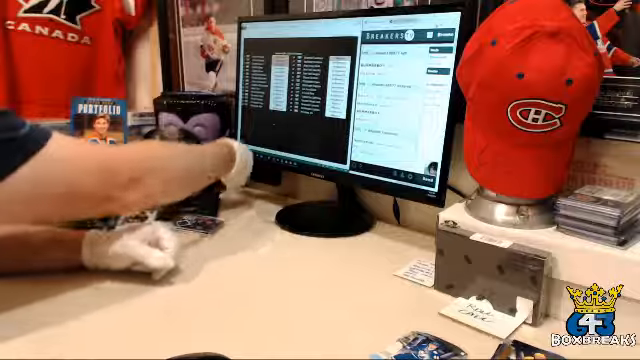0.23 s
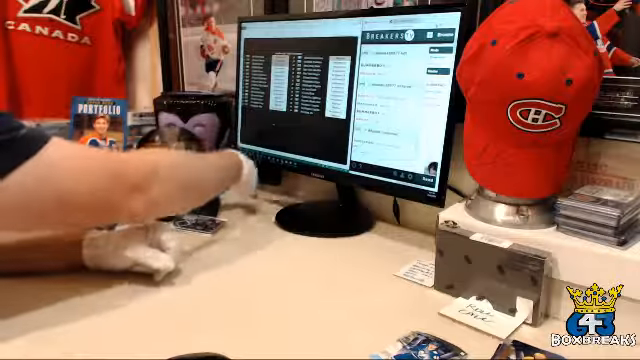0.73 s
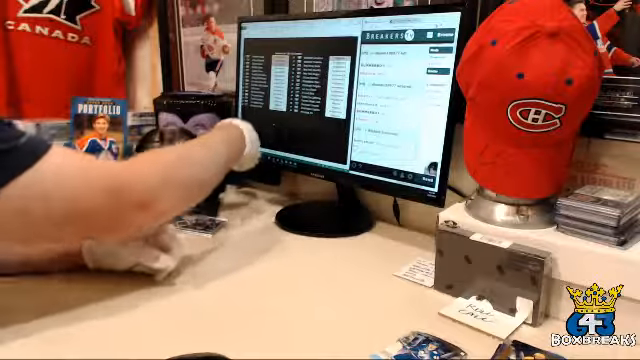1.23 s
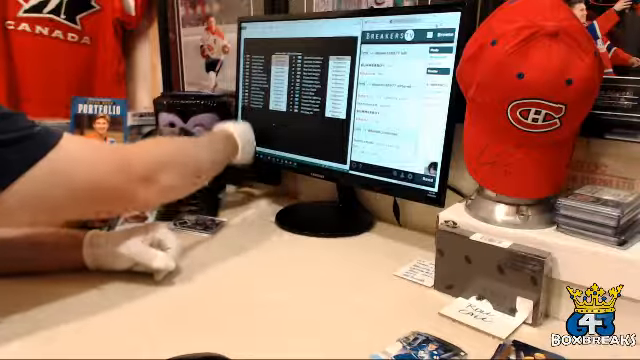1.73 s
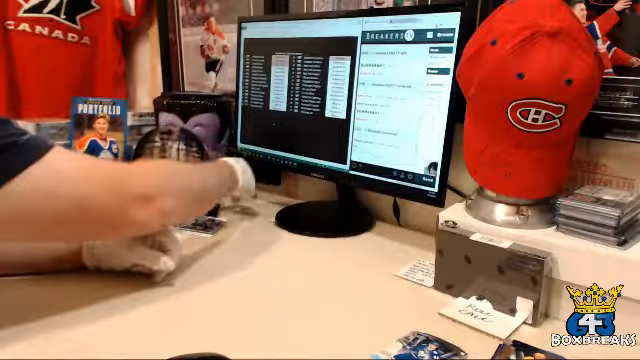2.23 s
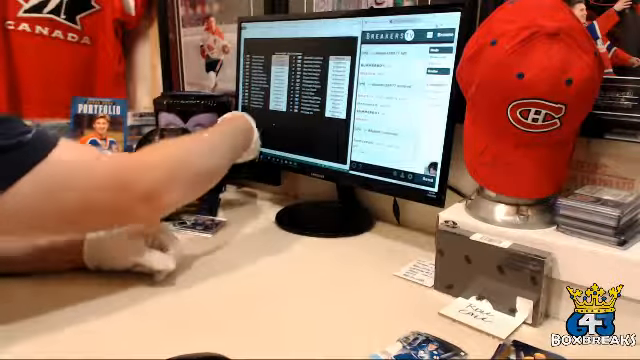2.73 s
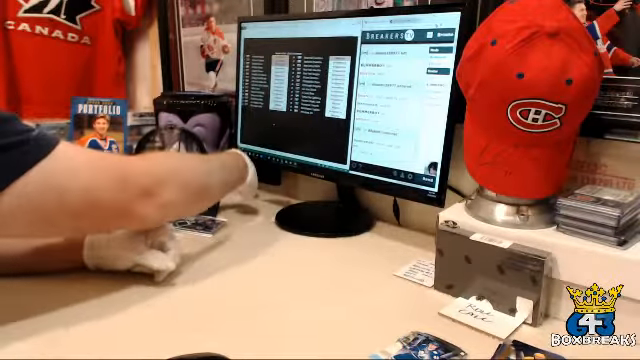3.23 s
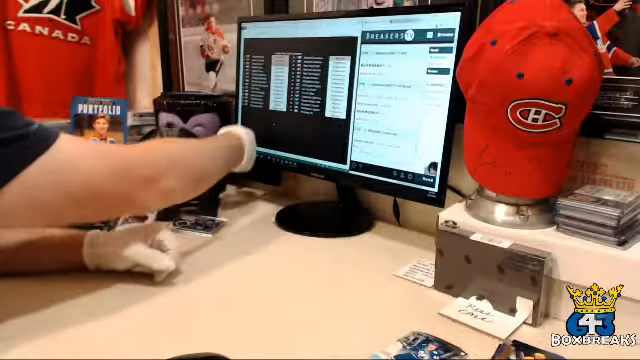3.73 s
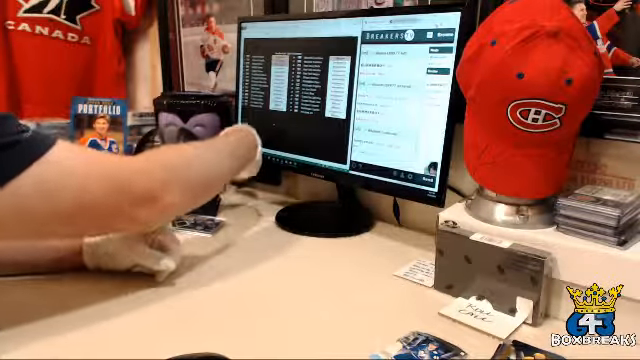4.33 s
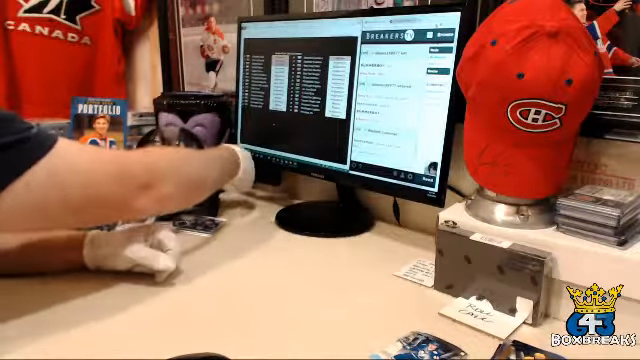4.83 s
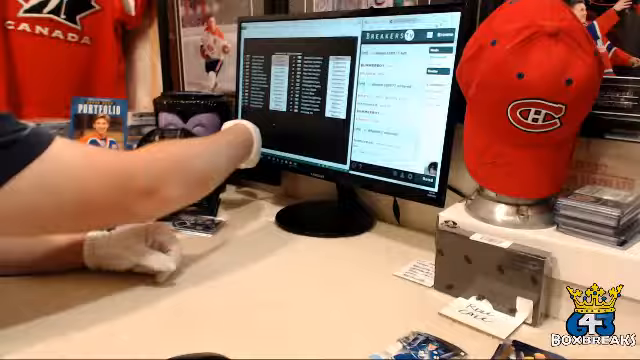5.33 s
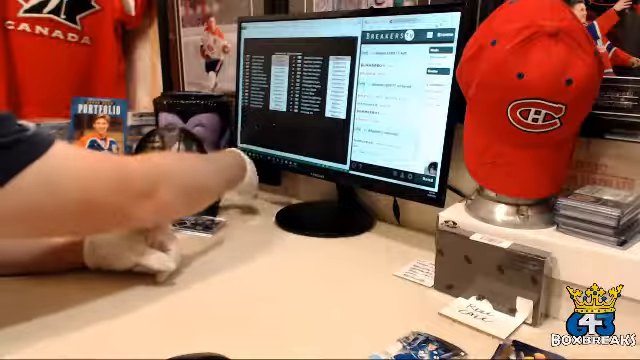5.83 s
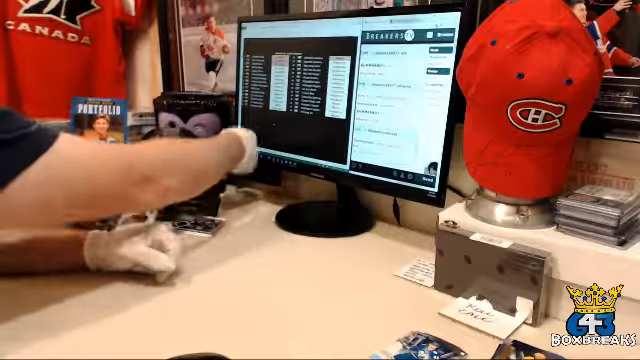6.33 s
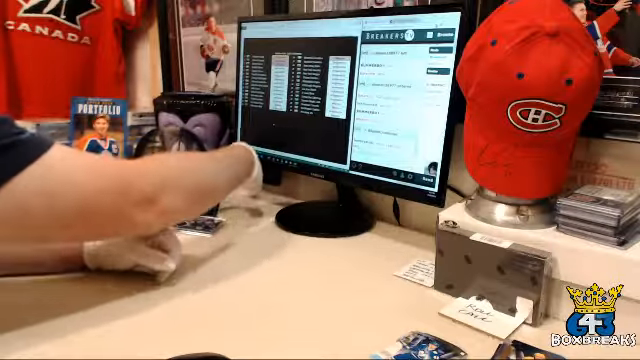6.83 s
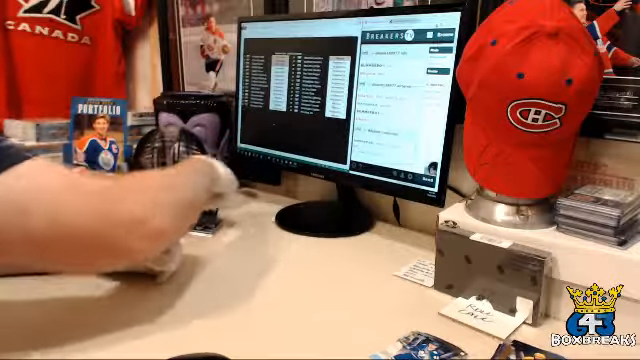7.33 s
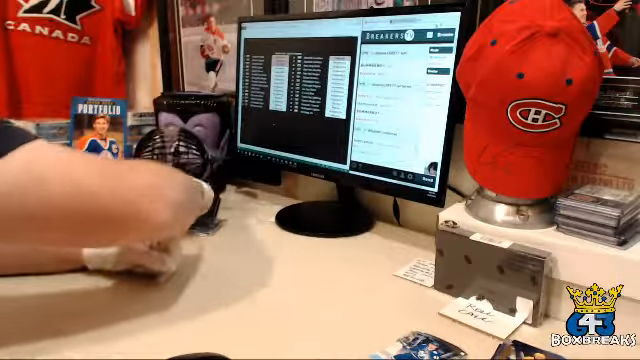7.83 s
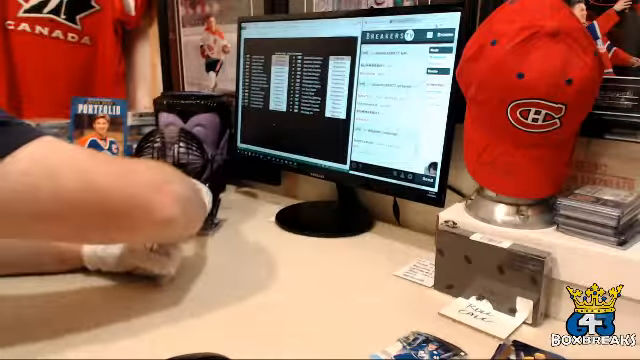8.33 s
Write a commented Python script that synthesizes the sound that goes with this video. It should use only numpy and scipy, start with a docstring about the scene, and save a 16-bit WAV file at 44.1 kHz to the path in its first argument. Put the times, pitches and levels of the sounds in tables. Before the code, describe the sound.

A wire cage full of hard balls is cranked on a desk, crashing loudly, then rattling steadily before one ball clatters down a chute and everything settles.

```python
"""Hand-cranked bingo cage

A wire cage full of balls is cranked on a desk in a small room: the balls crash about, then slide steadily.
Random contacts and clusters of rebounds excite the ringing wires, hoops, stand and desk.
One ball bounces down the chute, the cage stops and the rest settle with a few ticks over the room tone."""
import sys
import numpy as np
from scipy import signal
from scipy.fft import rfft, irfft
from scipy.io import wavfile
from scipy.ndimage import uniform_filter1d, map_coordinates

SR = 44100
rng = np.random.default_rng(int(sys.argv[2]) if len(sys.argv) > 2 else 0)


def wav_record(signal):
    """Record a signal, one row per channel, as 16-bit PCM in the file named by sys.argv[1]."""
    frames = np.transpose(np.atleast_2d(signal))
    bounded = np.clip(frames, -1, 1)
    # unit amplitude maps onto the largest positive 16-bit level
    quanta = np.round(bounded * 32767).astype(np.int16)
    wavfile.write(sys.argv[1], SR, quanta)


N = 378642
TIME = np.arange(N) / SR
RING_TIME = TIME[:16384]   # long enough for one contact to ring out
RING_HZ = np.maximum(np.fft.rfftfreq(len(RING_TIME), 1 / SR), 1)


def from_db(db):
    """Decibels to gain."""
    return 10 ** (np.asarray(db) / 20)


def unit(x):
    """Scale to an average energy of one per channel."""
    energy = np.mean(np.sum(x ** 2, axis=-1))
    return x / np.sqrt(energy + 1e-20)


def add(out, s, sound):
    """Mix a short sound in at time s; it may already be under way at time zero."""
    at = int(s * SR)
    sound, at = sound[max(-at, 0):], max(at, 0)
    out[at:at + len(sound)] += sound[:N - at]


def at_hz(points):
    """A spectrum joined by straight lines on a log frequency axis."""
    hz, value = np.transpose(points)
    return np.interp(np.log(RING_HZ), np.log(hz), value)


def focus(hz, narrow_db):
    """Gain in dB of a contact that favours the modes around one pitch."""
    half_octaves = 2 * np.log2(RING_HZ / hz)
    return -narrow_db * np.log2(1 + half_octaves ** 2)


def pulse(db):
    """The shortest causal pulse with this spectrum: minimum phase, by folding the cepstrum."""
    cepstrum = irfft(np.log(from_db(db)))
    cepstrum[1:] *= 2
    cepstrum[len(cepstrum) // 2:] = 0
    return unit(irfft(np.exp(rfft(cepstrum))))


def through(x, response):
    """Filter x by a response, keeping its length."""
    full = signal.oaconvolve(np.atleast_2d(x), np.atleast_2d(response), axes=-1)
    return full[:, :x.shape[-1]]


def wash(t60, channels=1):
    """Countless weak modes or echoes: noise that dies away by 60 dB in t60 seconds."""
    noise = rng.standard_normal((channels, len(RING_TIME)))
    return unit(noise * np.exp(-np.log(1000) * RING_TIME / t60))


def drift(per_s, t=TIME):
    """Random wandering around zero, in straight lines between per_s new values a second."""
    return np.interp(t * per_s, np.arange(512), rng.standard_normal(512))


def wander(x, share, per_s):
    """Bend time slightly, so that all pitches stray up and down by a small share."""
    bent_time = TIME + share / per_s * drift(per_s)
    return map_coordinates(x[0], [bent_time * SR], order=3)


def contacts(per_s, spread_db):
    """Random touches of uneven strength; their power is evened out over each twentieth of a second."""
    touches = rng.random(N) < per_s / SR
    clicks = touches * from_db(spread_db * rng.standard_normal(N)) * rng.choice([-1, 1], N)
    power = np.maximum(uniform_filter1d(clicks ** 2, SR // 20), 0)
    return clicks / np.sqrt(power + 1e-5)


def blow(db, chatter_s, soft=0.62, count=18, uneven_db=6):
    """A cluster of rebounds that swells (more slowly if soft is large) and dies away."""
    force = np.zeros(len(RING_TIME))
    delay = 3 * (np.arange(count) + rng.random(count)) / count   # in units of chatter_s
    sizes = np.exp(-delay) * (1 - np.exp(-delay / soft))
    sizes = sizes * rng.choice([-1, 1], count) * from_db(rng.normal(0, uneven_db, count))
    force[(delay * chatter_s * SR).astype(int)] = from_db(db) * unit(sizes)
    return force


def clack(hz, attack_s, decay_s, rough=0.32, rough_per_s=180):
    """One resonance that a chattering ball pumps up and lets die; the rebounds jog its strength and phase."""
    shape = (1 - np.exp(-RING_TIME / attack_s)) ** 2 * np.exp(-RING_TIME / decay_s)
    strength = rough * drift(rough_per_s, RING_TIME)
    phase = rough * drift(rough_per_s, RING_TIME)
    return unit(shape * np.exp(strength) * np.sin(2 * np.pi * hz * RING_TIME + phase))


def body(colour, modes, ring_db, wash_db, t60, spot_db):
    """Response to one contact: a click, a diffuse ring and modes whose strengths depend on the spot struck."""
    click = pulse(colour)
    spots = from_db(rng.normal(0, spot_db, len(modes))) * rng.choice([-1, 1], len(modes))
    rings = np.zeros(len(RING_TIME))
    for spot, (hz, width_hz, db) in zip(spots, modes):
        ring = np.cos(2 * np.pi * hz * RING_TIME) * np.exp(-np.pi * width_hz * RING_TIME)
        rings += spot * from_db(db) * unit(ring)
    # the part radiates its modes only within its own range
    rings = through(rings, pulse(np.minimum(colour + 12, 0)))
    diffuse = through(wash(t60), click)
    return unit(click + from_db(wash_db) * diffuse + from_db(ring_db) * unit(rings))


def struck(force, colour, modes, ring_db, wash_db, t60, spot_db, dwell_s, count=7, tint_db=0):
    """Contacts move to another spot after each dwell; each favours other pitches, so the colour keeps shifting."""
    dwell = max(int(dwell_s * SR), 1)   # a dwell of zero picks a spot for every sample
    spot = rng.integers(0, count, N)[np.arange(N) // dwell]
    out = np.zeros((1, N))
    for k in range(count):
        tint = tint_db * np.cos(2 * np.pi * (2 * np.log2(RING_HZ) + k / count))
        response = body(at_hz(colour) + tint, modes, ring_db, wash_db, t60, spot_db)
        out += through(force * (spot == k), response)
    return out


# Colour of the room tone. Each row: frequency in Hz, relative level in dB.
ROOM_TONE = [(25, -18), (65, -32), (110, -5), (150, -2), (260, -3), (400, -16.5), (530, -14.5), (850, -17),
             (1100, -24.5), (2000, -31.5), (2450, -24.5), (2700, -37.5), (4900, -40.5), (8500, -56.5)]
ROOM_TONE_DB = -52.5


def room_tone(apart_db=-3, left_db=2.0, waver_db=1):
    """Low rush of the room: filtered noise, partly shared by both ears, wavering and stronger on the left."""
    air = rng.standard_normal(N) + from_db(apart_db) * rng.standard_normal((2, N))
    air = air * from_db(waver_db * drift(26))
    sides = from_db([[left_db], [-left_db]])
    return from_db(ROOM_TONE_DB) * sides * through(air, pulse(at_hz(ROOM_TONE)))


# Place of the cage between the ears. Each row: frequency in Hz, left minus right in dB.
LEAN = [(60, 1), (130, 6.5), (280, 2), (500, -2.5), (1000, 0.8), (2000, 0.2), (4500, 0)]


def room(x, wet_db, t60):
    """Direct sound leaning to one side by frequency, plus soft reflections that differ at each ear."""
    lean_db = at_hz(LEAN) * np.array([[1], [-1]]) / 2
    direct = np.array([pulse(side) * np.sqrt(np.mean(from_db(side) ** 2)) for side in lean_db])
    return through(x, direct + from_db(wet_db) * wash(t60, channels=2))


# Colour of a contact on desk and stand. Each row: frequency in Hz, relative level in dB.
DESK = [(25, -36.5), (60, -27), (90, -1.5), (140, -7.5), (210, 10.5), (320, -12), (700, -43.5)]
STAND = [(40, -45), (100, -16), (210, 10), (330, 12.5), (450, 3.5), (620, -22), (1200, -47)]
# Ringing of desk and stand. Each row: frequency in Hz, width in Hz, relative level in dB.
DESK_MODES = [(108, 22, 0.5), (146, 15, -3), (212.8, 11, -4.5)]
STAND_MODES = [(325.7, 35, -2)]
# Thumps of the stand on the desk; the row at 6.969 s is instead the low body of the ball's # first hit on the
# chute. Each row: time in seconds (it begins 5 ms earlier), # peak level in dB before the room, pitch in Hz.
THUMPS = [(0.458, -24, 310), (0.665, -24.5, 302), (0.869, -29.5, 153), (1.319, -30, 131),
          (1.456, -28.5, 313), (1.992, -26.5, 317), (2.826, -31.5, 156), (2.894, -36, 108),
          (2.978, -30.5, 146), (3.097, -27.5, 341), (3.669, -31, 167), (3.773, -27, 322), (3.786, -30, 143),
          (4.174, -35.5, 222), (4.334, -35, 135), (4.389, -36, 162), (4.529, -30.5, 325),
          (4.56, -26.5, 134), (4.598, -29, 130), (4.671, -31, 307), (5.187, -37, 148), (5.479, -35.5, 120),
          (5.722, -34, 226), (5.844, -33.5, 332), (6.335, -31.5, 346), (6.444, -26, 301), (6.704, -33, 223),
          (6.969, -27.5, 235), (7.272, -36, 146), (7.846, -35, 149), (8.224, -39, 230.3), (8.475, -43, 240),
          (8.544, -37.5, 238)]
THUMP_SWELL_S = 0.0093


def desk(desk_gain, stand_gain):
    """The stand drums on the desk top, and now and then rocks with a soft thump, a swelling and fading sine;
    one such sine gives the chute's first hit its low body."""
    top_force = desk_gain * contacts(per_s=140, spread_db=2.5)
    top = struck(top_force, DESK, DESK_MODES, ring_db=1.5, wash_db=0.5, t60=0.1, spot_db=7, dwell_s=0.034)
    stand_force = from_db(6.5) * stand_gain * contacts(per_s=150, spread_db=5.0)
    stand = struck(stand_force, STAND, STAND_MODES,
                   ring_db=9.0, wash_db=8.0, t60=0.057, spot_db=0, dwell_s=.03)
    thumps = np.zeros(N)
    swell = RING_TIME / THUMP_SWELL_S
    shape = (swell * np.exp(1 - swell)) ** 2
    for s, db, hz in THUMPS:
        add(thumps, s - .005, from_db(db) * shape * np.sin(2 * np.pi * hz * RING_TIME))
    return top + stand + thumps


# Colour of a contact on the chute. Each row: frequency in Hz, relative level in dB.
CHUTE = [(60, -39.5), (250, -14), (500, -14.5), (750, -5.5), (1600, -2.5), (2400, -4), (3050, -9.5),
         (4350, 1), (5000, -8.5), (7500, -28)]
# Ringing of the chute. Each row: frequency in Hz, width in Hz, relative level in dB.
CHUTE_MODES = [(1650, 40, 2), (2250, 20, -6), (4170, 100, -5)]
# A ball bouncing down the chute. Each row: start in seconds, chatter level in dB, ring level in dB,
# ring pitch in Hz, decay time in seconds, low-pass cut-off of the chatter in Hz.
DROPS = [(6.9682, 8, -8.5, 1870, 0.00037, 2160), (6.977, 2.5, 7.5, 2650, 0.0019, 3300),
         (6.985, 2, 5, 2500, .0062, 3500), (7.019, 6.5, 4.5, 2250, 0.0092, 4940),
         (7.033, 7.5, 4.5, 1724, 0.009, 4800), (7.065, 5, -2, 1630, .003, 4900),
         (7.075, 0, -2, 1665, .007, 4900), (7.186, -2, -5.5, 1180, 0.0036, 5200),
         (7.1965, 4.5, -7, 1850, 0.0034, 5830), (7.2055, 5, 5, 1655, 0.0052, 5200),
         (7.263, -12.5, -17.5, 1650, 0.016, 4500)]


def chute(narrow_db=0.9):
    """Each bounce is a blunt chatter on the chute, with a firm ring whose pitch depends on where the ball lands."""
    out = np.zeros(N)
    for s, chatter_db, ring_db, hz, decay_s, top_hz in DROPS:
        walls = body(at_hz(CHUTE) + focus(hz, narrow_db), CHUTE_MODES,
                     ring_db=-9, wash_db=-7, t60=.04, spot_db=1)
        chatter = through(blow(0, decay_s, soft=.6, count=60, uneven_db=2), walls)
        low_pass = signal.butter(8, top_hz, fs=SR, output="sos")
        blunt = unit(signal.sosfilt(low_pass, chatter))[0]
        ring = clack(hz, attack_s=decay_s, decay_s=decay_s)
        add(out, s, from_db(chatter_db) * blunt + from_db(ring_db) * ring)
    return out


# The heap sliding while the cage turns. Each row: time in seconds, level in dB before each part's own gain.
SLIDE = [(0, -20), (0.33, -24.5), (0.42, -30.5), (0.9, -24.5), (1.3, -35), (1.41, -39.5), (1.7, -37),
         (2.27, -36.5), (2.39, -48), (2.53, -38.5), (2.61, -43.5), (2.79, -39.5), (3.0, -40), (3.27, -35),
         (3.57, -40.5), (3.8, -35), (4.03, -40), (4.2, -36), (6.3, -37), (7.14, -38.5), (7.25, -52.5)]
STOP_DB_PER_S = 89   # the sliding dies once the crank stops
# the slide swells as each rib passes under the heap; rate is typical, unevenness is a log spread
RIBS_PER_S, RIB_UNEVEN, RIB_FLUTTER_DB = 14, 0.25, 1.57


def sliding():
    """Gain of the sliding heap: it flutters as the ribs pass and dies when the cage stops."""
    s, db = np.transpose(SLIDE)
    passes = np.cumsum(np.exp(RIB_UNEVEN * rng.standard_normal(256))) / RIBS_PER_S
    flutter = np.cos(2 * np.pi * np.interp(TIME, passes, np.arange(len(passes))))
    stopping_db = STOP_DB_PER_S * np.maximum(TIME - s[-1], 0)
    return from_db(np.interp(TIME, s, db) + RIB_FLUTTER_DB * flutter - stopping_db)


# Colour of a contact on the frame. Each row: frequency in Hz, relative level in dB.
FRAME = [(60, -48.5), (250, -16.5), (480, -11), (610, -25.5), (740, -5.5), (870, -8.5), (1010, 0.5),
         (1180, -4.5), (1420, -5), (1600, -6), (2000, -5), (2500, -9.5), (3500, -14.5), (8000, -51.5)]
# Ringing of the hoops under the dragging heap. Each row: frequency in Hz, width in Hz, relative level in dB.
DRAG_MODES = [(735, 50, -2), (1650, 42, 0)]


def dragging(turning):
    """While the cage turns, the heap bumps softly over the hoops and keeps their low modes humming."""
    force = from_db(-52.5) * turning * contacts(per_s=84, spread_db=3.5)
    return struck(force, FRAME, DRAG_MODES, ring_db=13.5, wash_db=7, t60=0.088, spot_db=14, dwell_s=.04)


# Single balls knocking on the hoops. Each row: time in seconds (it begins 5 ms earlier),
# strength in dB before the chatter and ring gains, pitch in Hz.
KNOCKS = [(0.012, 3.5, 3100), (0.488, 4, 1041), (0.546, 2, 1954), (0.568, 3, 976), (0.61, 0.5, 2200),
          (0.657, 0, 1120), (0.811, 0.5, 1035), (1.069, -2, 1018), (1.188, 2.5, 1046), (1.22, -3.5, 1580),
          (1.285, -5, 1560), (1.357, -2.5, 1580), (1.562, -4, 1093), (1.595, -13, 2400), (1.88, -4, 1570),
          (1.9, -5, 963), (1.954, -6.5, 970), (2.004, -6.5, 1860), (2.022, -4, 1053), (2.055, -6, 1284),
          (2.084, -2, 1140), (2.167, -1.5, 1203), (2.635, 2.5, 1116), (2.65, -1, 2290), (2.845, -2.5, 949),
          (3.045, -9, 2210), (3.103, -0.5, 2243), (3.136, -8, 2520), (3.217, -5, 1190), (3.671, -3, 954),
          (3.7, -11, 2200), (3.719, -1.5, 2710), (3.765, -5.5, 1050), (4.114, -8, 1613),
          (4.356, -9.5, 1130), (4.415, -5, 1610), (4.534, -5.5, 944), (5.018, -10, 1584), (5.377, -2, 935),
          (5.464, -8, 967), (5.846, -12.5, 1195), (5.972, -7.5, 1610), (6.164, -13, 1573),
          (6.765, -11, 1180)]


def knocks(narrow_db=9, chatter_db=-5, ring_db=-0.5):
    """A lone ball chatters on a hoop, which answers with a short pitched clack."""
    out = np.zeros(N)
    for s, db, hz in KNOCKS:
        rebounds = blow(0, chatter_s=.015, soft=1.7, count=40, uneven_db=2.5)
        chatter = unit(through(rebounds, pulse(focus(hz, narrow_db))))[0]
        ring = clack(hz, attack_s=0.01, decay_s=0.012)
        add(out, s - .005, from_db(db) * (from_db(chatter_db) * chatter + from_db(ring_db) * ring))
    return out


# Ringing of the frame. Each row: frequency in Hz, width in Hz, relative level in dB.
FRAME_MODES = [(937.7, 16.4, 2), (1022, 50, 1), (1102, 51, 0), (1202, 21, 4), (1540, 23, 4.5),
               (1624, 18, -4), (1680, 22, -7.5), (2202, 26, -3)]
# Single hard hits, also played by clashes() and hits(). Each row: start in seconds,
# level on the wires in dB, level on the frame in dB, pitch in Hz.
HITS = [(0.007, 9.5, -10, 6780), (0.065, 6.5, 4.5, 6200), (0.123, 8, 2, 6950), (0.142, 8.5, 3.5, 7040),
        (0.459, 8, -3, 4630), (0.525, 2, 5, 6500), (0.601, -5, -7, 5500), (0.842, 9, 0, 6600),
        (1.067, 4, -6, 4470), (1.126, 4.5, 1.5, 6060), (1.191, 3, -1, 4350), (1.264, 3.5, -12, 6000),
        (1.451, 2.5, -13, 4840), (2.629, 1.5, -9.5, 5400), (3.611, -9, -18, 5000),
        (4.403, -12.5, -10.5, 3550), (5.841, -4.5, -15.5, 4900)]
# Balls settling, also played by clashes() and wires(). Each row: start in seconds,
# level on the wires in dB, level on each other in dB.
TICKS = [(7.312, -31, -29), (7.3574, -29, -35), (7.435, -30, -33.5), (7.6016, -36.5, -36),
         (7.819, -33.5, -45), (8.2128, -34, -39), (8.2287, -28.5, -49)]
TICK_FRAME_DB = 10.5   # the frame takes this much more of a tick than the balls


def frame(level):
    """Heavier knocks of falling balls ring the hoops; settling balls stir them faintly."""
    force = from_db(-0.5) * level * contacts(per_s=300, spread_db=0.5)
    for s, wire_db, frame_db, hz in HITS:
        add(force, s, blow(frame_db, chatter_s=0.0059))
    for s, wire_db, ball_db in TICKS:
        add(force, s, blow(ball_db + TICK_FRAME_DB, chatter_s=0.067))
    return struck(force, FRAME, FRAME_MODES, ring_db=8.5, wash_db=9, t60=0.035, spot_db=4.0,
                  dwell_s=.02, count=9, tint_db=2.0)


# Colour of balls rubbing in the heap. Each row: frequency in Hz, relative level in dB.
BALL = [(60, -64.5), (1400, -23), (2200, -3.5), (2850, -3), (3200, 2.5), (3900, 5), (5000, -14),
        (8500, -36.5)]
# Ringing of the hoops when balls click together. Each row: frequency in Hz, width in Hz, relative level in dB.
HOOP_MODES = [(2643, 54, -1.5), (2710, 14, 3), (3198, 40, -1)]
HIT_CLASH_DB = -1   # a hard hit also cracks against the next ball, this far from its level on the frame


def clashes(level):
    """Hard balls click together in the heap, or as they settle, and stir the upper modes of the hoops."""
    force = from_db(-1.0) * level * contacts(per_s=900, spread_db=0.5)
    for s, wire_db, ball_db in TICKS:
        add(force, s, blow(ball_db, chatter_s=0.0034))
    for s, wire_db, frame_db, hz in HITS:
        add(force, s, blow(frame_db + HIT_CLASH_DB, chatter_s=.005))
    return struck(force, BALL, HOOP_MODES, ring_db=0.5, wash_db=10.0, t60=0.086, spot_db=2.5,
                  dwell_s=.015, tint_db=2.5)


# Colour of head-on clicks between balls. Each row: frequency in Hz, relative level in dB.
CRACK = [(300, -26), (1500, -2.5), (7500, 9.5), (9000, -15.5)]


def cracks(level, gain_db=-9):
    """Falling balls meet head-on in dry, separate clicks that cover the treble."""
    clicks = from_db(gain_db) * level * contacts(per_s=170, spread_db=3)
    return through(clicks, pulse(at_hz(CRACK)))[0]


# Colour of a contact on the wires, also used by hits(). Each row: frequency in Hz, relative level in dB.
WIRE = [(60, -60.5), (500, -42), (1500, -20.5), (2600, -27.5), (3700, -20.5), (4400, -5.5), (5600, -1),
        (6600, 1), (7400, -2), (8000, -14.5), (8700, -23), (9300, -60)]
# Ringing of the wires, free (also in hits()) and damped by resting balls.
# Each row: frequency in Hz, width in Hz, relative level in dB.
WIRE_MODES = [(4602, 100, 1), (4900, 38, -8), (4930, 22, -14.5), (6385, 60, -3.5), (6800, 30, -6.5)]
LOADED_MODES = [(4334, 200, -3), (4740, 203, -2.5), (4800, 82, -3.5), (5000, 120, -4)]


def wires(level, airborne_db=-34):
    """Thrown and settling balls let the wires ring; the sliding heap damps them and its weight bends their pitch."""
    force = from_db(-3.5) * level * contacts(per_s=1600, spread_db=1.5)
    # the louder the contacts, the more of them come from thrown balls
    thrown_share = level ** 2 / (level ** 2 + from_db(airborne_db) ** 2)
    thrown = rng.random(N) < thrown_share
    free = force * thrown
    for s, wire_db, ball_db in TICKS:
        add(free, s, blow(wire_db, chatter_s=0.0044))
    ringing = struck(free, WIRE, WIRE_MODES, ring_db=3, wash_db=0, t60=0.069, spot_db=1,
                     dwell_s=.005, count=7, tint_db=1.5)
    damped = struck(force * ~thrown, WIRE, LOADED_MODES, ring_db=2.5, wash_db=4.5, t60=0.028, spot_db=2.5,
                    dwell_s=0, count=6)
    return wander(ringing, share=.007, per_s=12) + wander(damped, share=.011, per_s=9)


def hits(narrow_db=4, clack_db=-8):
    """A ball that falls hard rebounds on one wire, which answers with a pitch of its own."""
    out = np.zeros(N)
    for s, wire_db, frame_db, hz in HITS:
        wire = body(at_hz(WIRE) + focus(hz, narrow_db), WIRE_MODES,
                    ring_db=-5, wash_db=-3, t60=.06, spot_db=1.5)
        rebounds = unit(through(blow(0, chatter_s=0.005, count=30, uneven_db=2.5), wire))[0]
        ring = clack(hz, attack_s=.001, decay_s=0.014)
        add(out, s, from_db(wire_db) * (rebounds + from_db(clack_db) * ring))
    return out


def surges(rows, attack_s, release_s):
    """One gain curve per dB column: each event rises, holds and dies away; overlapping events add in power."""
    power = np.zeros((len(rows[0]) - 2, N))
    t = TIME[:SR]
    for s, length_s, *levels_db in rows:
        rise = np.sin(np.pi / 2 * np.minimum(t / attack_s, 1)) ** 2
        shape = rise * np.exp(-np.maximum(t - length_s, 0) / release_s)
        for part, db in zip(power, levels_db):
            add(part, s, (from_db(db) * shape) ** 2)
    return np.sqrt(power)


# Batches of balls carried up and spilling down. Each row: start in seconds, length before release in seconds,
# then levels in dB before each part's own gain: on the wires, on the frame, on each other.
SPILLS = [(-0.015, 0.041, -26, -20, -19.5), (0.055, 0.043, -18, -23, -22.5),
          (0.112, 0.048, -18.5, -26.5, -24.5), (0.17, 0.087, -29, -57, -30),
          (0.452, 0.11, -20.5, -31, -30.5), (0.51, 0.065, -18, -27.5, -25.5),
          (0.595, 0.11, -16.5, -27.5, -25.5), (0.73, 0.13, -26, -33.5, -31),
          (0.965, 0.092, -23, -36, -39.5), (1.035, 0.053, -19.5, -27.5, -25.5),
          (1.11, 0.16, -19.5, -32, -33), (1.3, 0.058, -25, -34.5, -59), (1.434, 0.036, -20.5, -29.5, -28.5),
          (1.495, 0.058, -43, -33.5, -53), (1.55, 0.042, -20.5, -29, -32.5),
          (1.595, 0.044, -23.5, -42, -58), (1.87, 0.18, -37, -38, -50), (2.115, 0.012, -26.5, -49, -42),
          (2.615, 0.055, -23.5, -29, -28), (2.662, 0.088, -17, -27.5, -32), (2.8, 0.034, -28, -36, -63),
          (2.88, 0.017, -29.5, -55, -45), (3.04, 0.036, -34, -43, -45), (3.085, 0.018, -19.5, -38.5, -40),
          (3.143, 0.03, -25, -44, -39), (3.195, 0.017, -21, -51, -39), (3.607, 0.17, -41, -44, -41.5),
          (3.748, 0.028, -25.5, -36.5, -34.5), (3.855, 0.048, -41.5, -41.5, -49),
          (4.335, 0.27, -48, -48.5, -56)]
SPILL_ATTACK_S, SPILL_RELEASE_S = 0.014, 0.02
# Spells in which the stand judders on the desk. Each row: start in seconds, length before release in seconds,
# then levels in dB before each part's own gain: desk, stand.
JUDDERS = [(0.02, 0.12, -43, -40.5), (0.46, 0.2, -42.5, -39), (0.97, 0.36, -58, -44.5),
           (1.88, 0.24, -50, -44), (2.66, 0.25, -44.5, -66), (3.04, 0.23, -49.5, -44),
           (3.63, 0.22, -47, -45.5), (4.34, 0.098, -48, -45), (4.51, 0.15, -45.5, -48.5),
           (6.26, 0.15, -42.5, -52.5), (6.68, 0.41, -50.5, -55)]
JUDDER_ATTACK_S, JUDDER_RELEASE_S = 0.011, 0.036
SLIDE_FRAME_DB, SLIDE_CLASH_DB = -10.5, -12   # how much the sliding stirs the hoops and the other balls
# once the slide is this loud, the turning cage drives desk and stand steadily at these levels
TURNING_SLIDE_DB, TURNING_DESK_DB, TURNING_STAND_DB = -37, -56, -58.5


def scene():
    """The steady slide and the spills drive every part of the cage; cage, chute and desk sound in the room."""
    slide = sliding()
    turning = np.minimum(slide / from_db(TURNING_SLIDE_DB), 1)
    on_wires, on_frame, on_balls = surges(SPILLS, SPILL_ATTACK_S, SPILL_RELEASE_S)
    on_desk, on_stand = surges(JUDDERS, JUDDER_ATTACK_S, JUDDER_RELEASE_S)

    desk_gain = np.hypot(on_desk, from_db(TURNING_DESK_DB) * turning)
    stand_gain = np.hypot(on_stand, from_db(TURNING_STAND_DB) * turning)
    rumble = desk(desk_gain, stand_gain)

    frame_level = np.hypot(on_frame, from_db(SLIDE_FRAME_DB) * slide)
    clash_level = np.hypot(on_balls, from_db(SLIDE_CLASH_DB) * slide)
    clatter = chute() + dragging(turning) + knocks() + frame(frame_level) + clashes(clash_level)

    hiss = cracks(np.hypot(on_balls, on_frame)) + wires(np.hypot(on_wires, slide)) + hits()

    mix = room_tone() + room(rumble, wet_db=-23.5, t60=0.14)
    return mix + room(clatter, wet_db=-17.0, t60=0.15) + room(hiss, wet_db=-25.5, t60=.2)


CUTOFF_HZ = 9000


def record(dry):
    """The microphone thins the deep bass, cuts steeply above the cut-off and clips at full scale."""
    thin = signal.sosfilt(signal.butter(2, 64, "high", fs=SR, output="sos"), dry)
    low_pass = signal.ellip(10, .2, 80, CUTOFF_HZ, fs=SR, output="sos")
    return np.clip(signal.sosfilt(low_pass, thin), -1, 1)


dry = scene()
out = record(dry)
wav_record(out)
```